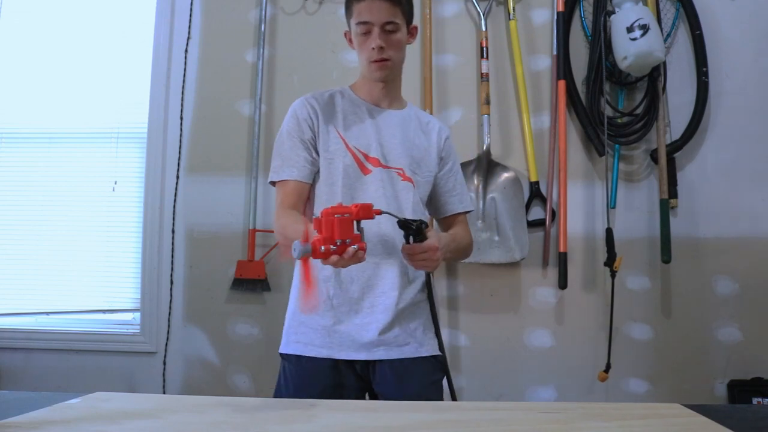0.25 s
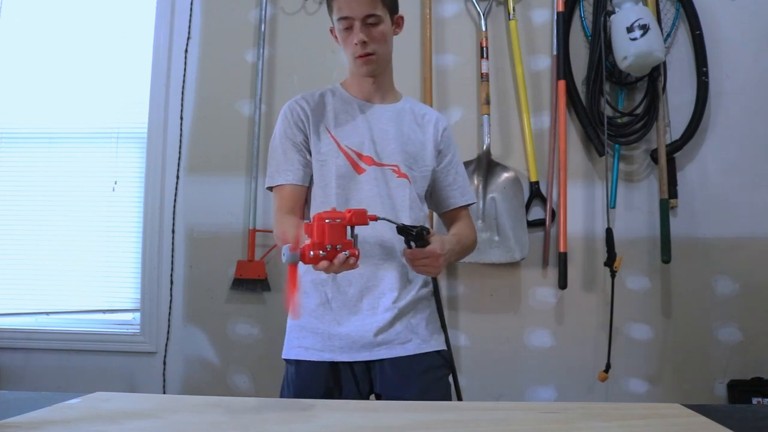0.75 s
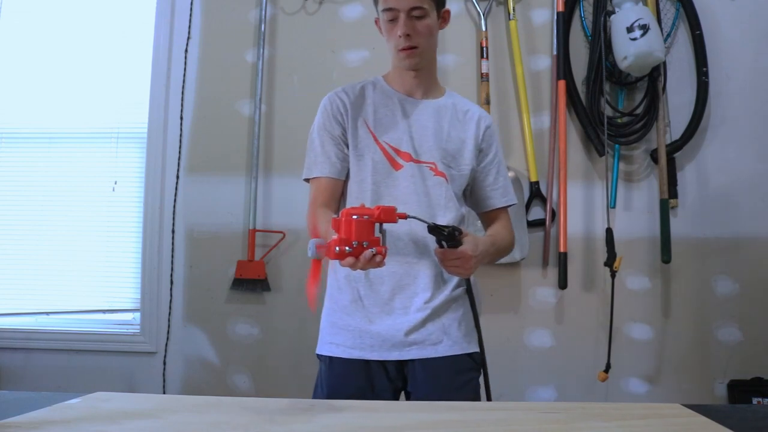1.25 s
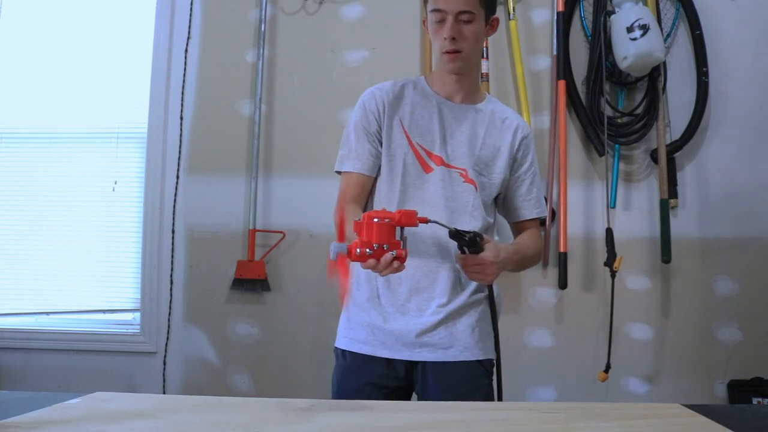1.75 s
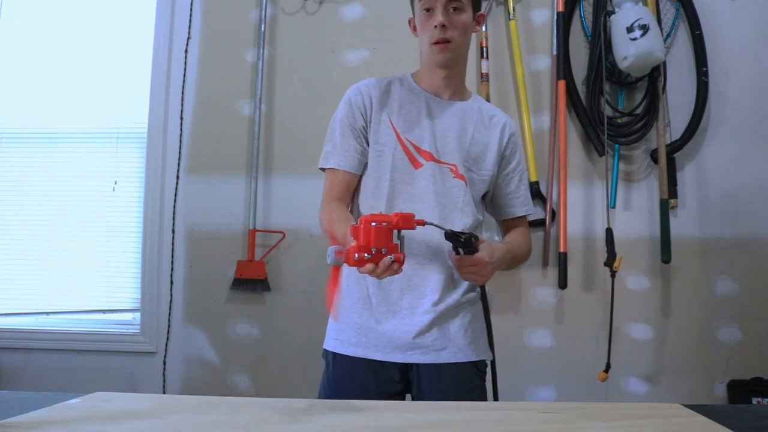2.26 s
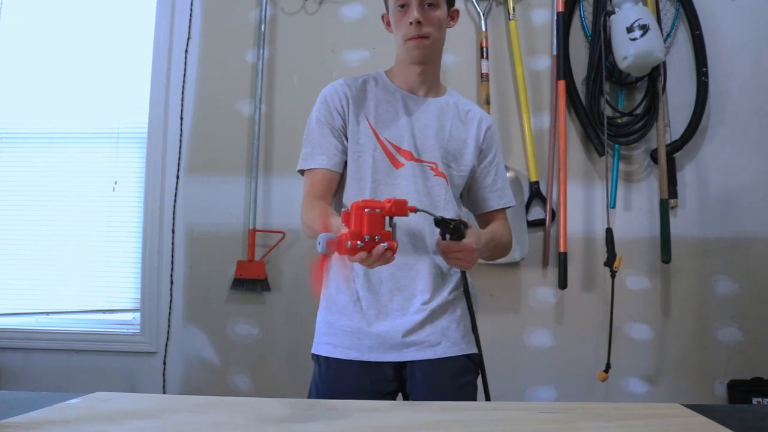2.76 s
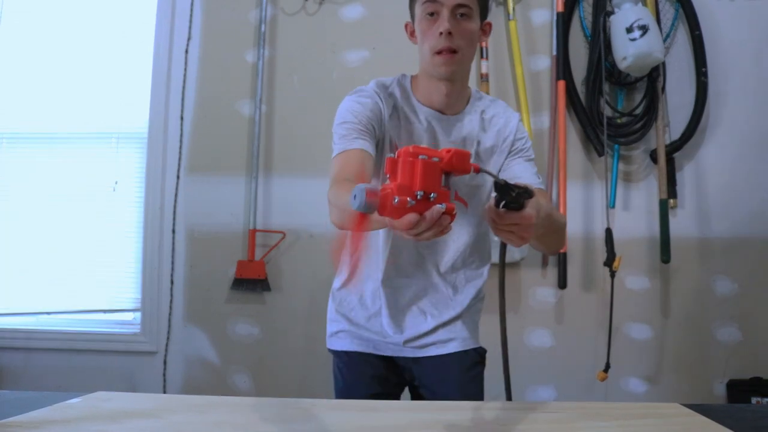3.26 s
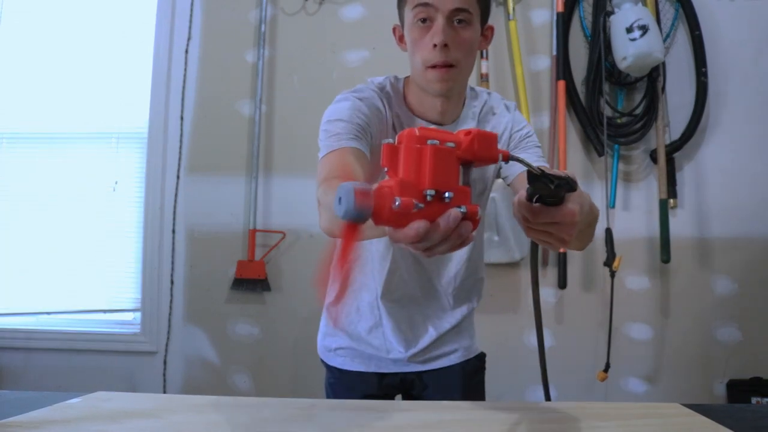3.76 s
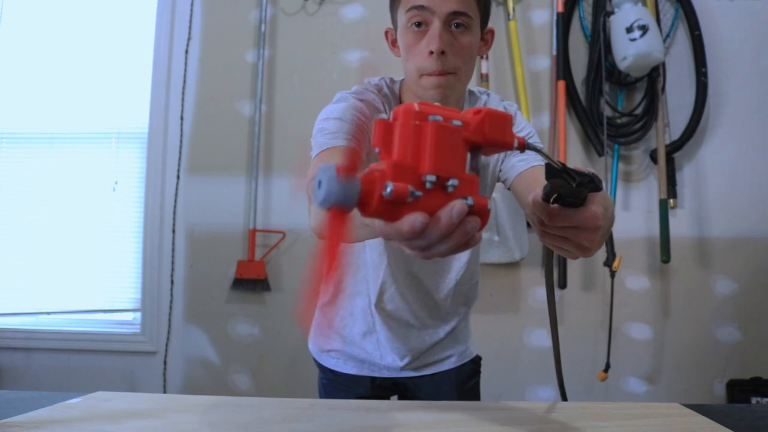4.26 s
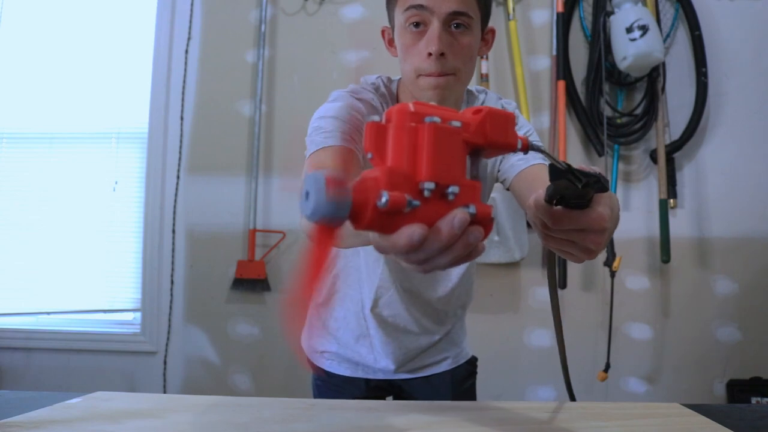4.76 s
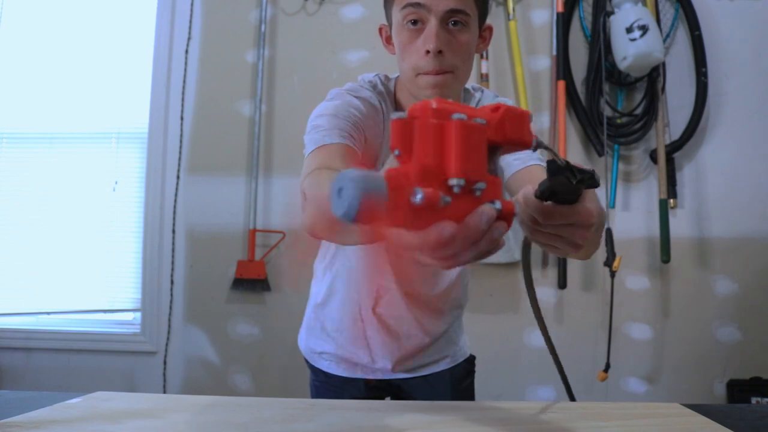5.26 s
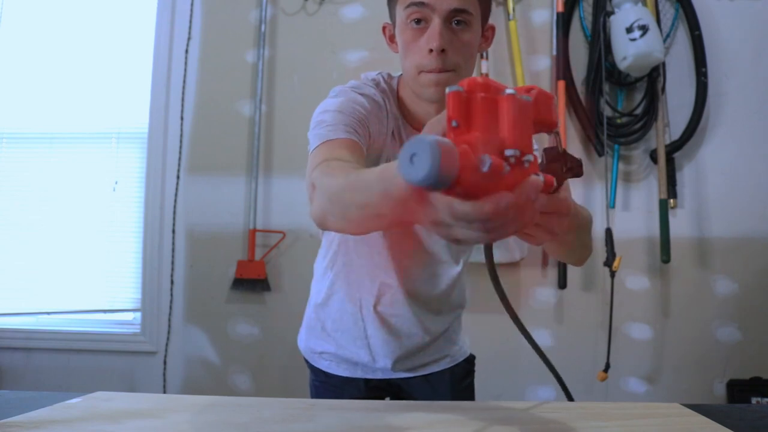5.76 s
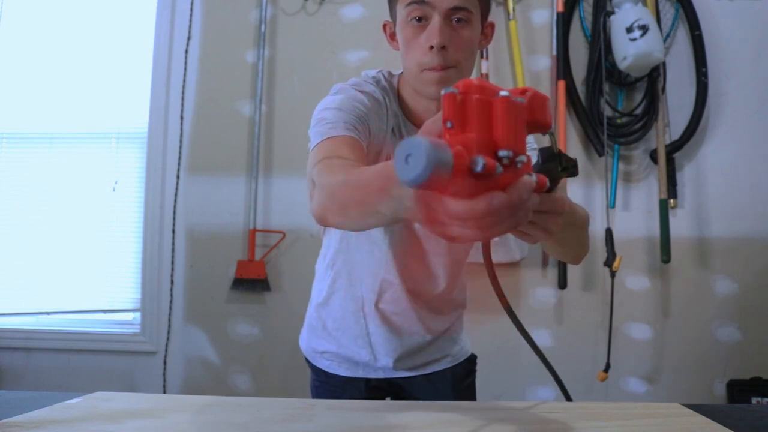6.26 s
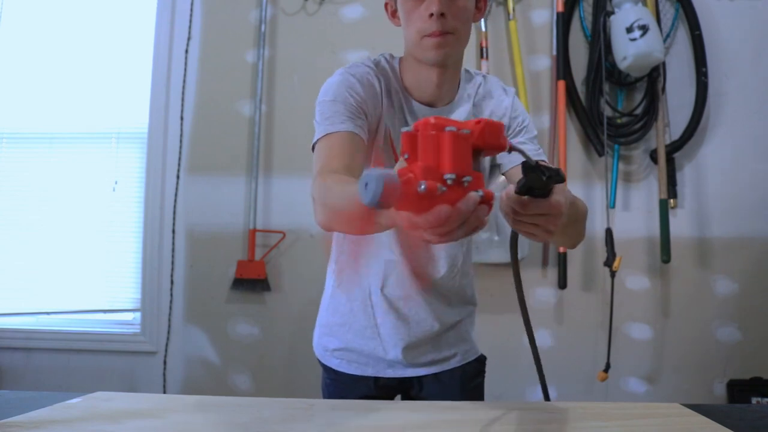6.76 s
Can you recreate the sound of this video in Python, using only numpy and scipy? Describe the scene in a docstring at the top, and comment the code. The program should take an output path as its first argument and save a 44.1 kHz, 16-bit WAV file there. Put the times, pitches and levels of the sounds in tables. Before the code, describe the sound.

Close, dry-edged pneumatic chatter in a bare workshop: rapid pulses of bright air, a continuous nozzle hiss with a thin high whistle, and brittle plastic clicking. The pace rises around three seconds, drops back with loud single knocks near four, then quickens again after five into a denser, blurred flutter as the engine turns toward the microphone. Faint low rumble and wavering hum lie beneath.

```python
"""Compressed-air piston engine

A small plastic engine, held in the hand and turned about, runs on a blow gun in a bare workshop.
The nozzle leak is coloured noise plus an edge whistle. Each turn the exhaust puffs and half a turn later
the inlet gasps: noise gated by the crank. A blade sweeps air; the loose crank rattles and knocks at both
stroke ends, ringing the casing. Sparse echoes, dull bumps, low rumble and wavering hum lie around it.
"""
import sys
import numpy as np
from scipy import signal
from scipy.fft import irfft
from scipy.io import wavfile
from scipy.ndimage import uniform_filter1d

SR = 44100
rng = np.random.default_rng(int(sys.argv[2]) if len(sys.argv) > 2 else 0)


def pcm_store(signal):
    """Save signal as 16-bit PCM."""
    levels = np.round(np.clip(np.atleast_2d(signal), -1, 1) * 32767)
    wavfile.write(sys.argv[1], SR, levels.astype(np.int16).T)


N = 309141
T = np.arange(N) / SR


def gain_of(db):
    """Decibels to amplitude."""
    return 10 ** (np.asarray(db) / 20)


def evened(x):
    """Scaled to rms 1."""
    return x / np.sqrt(np.mean(x ** 2) + 1e-20)


def read(points, hz):
    """Spectrum table interpolated on a log-frequency axis."""
    f, value = np.transpose(points)
    return np.interp(np.log(hz + 1), np.log(f + 1), value)


def curves(table):
    """Every column after the first, interpolated to every sample."""
    s, *columns = np.transpose(table)
    return [np.interp(T, s, c) for c in columns]


def add(mix, s, sound):
    """Mixes a sound in at s seconds."""
    part = mix[round(s * SR):][:len(sound)]
    part += sound[:len(part)]


# building noise, relative density: f/Hz, level/dB per Hz
RUMBLE_SPECTRUM = [(25, -19), (40, -7), (60, -24), (120, -4.5), (250, 1), (450, -52), (900, -44),
                   (2000, -8)]


def rumble():
    """Low noise of the building: random spectrum under a fixed colour."""
    hz = np.fft.rfftfreq(N, 1 / SR)
    re, im = rng.standard_normal((2, len(hz)))
    return evened(irfft((re + 1j * im) * gain_of(read(RUMBLE_SPECTRUM, hz)), N))


# hum tones, relative: f/Hz, rms waver/Hz, level/dB
HUM_TONES = [(54, 1.5, -1.5), (87, 2.5, .5), (207, 3, -3), (1067, 4, 6), (1220, 12, 3)]


def hum():
    """Faint tones whose pitch and strength waver."""
    out = np.zeros(N)
    for hz, waver_hz, db in HUM_TONES:
        drift, swell = (evened(uniform_filter1d(v, size=4000)) for v in rng.standard_normal((2, N)))
        phase = 2 * np.pi * np.cumsum(hz + waver_hz * drift) / SR
        out += gain_of(db + 1.5 * swell) * np.sin(phase)
    return evened(out)


# reverberation: f/Hz, t60/s
ROOM_DECAY = [(200, 0.99), (1000, 0.9), (4000, 0.49), (9000, 0.4), (16000, 0.69)]


def workshop(x):
    """Sparse echoes of random sign, each band dying at its own speed."""
    taps = np.zeros(SR // 2)
    at = np.arange(200, len(taps) - 20, 20)
    taps[at + rng.integers(0, 20, len(at))] = rng.choice([-1., 1.], len(at))
    hz, t, z = signal.stft(taps, SR, nperseg=256)
    decay = gain_of(-60 * t / read(ROOM_DECAY, hz)[:, None])
    tail = signal.istft(z * decay, SR, nperseg=256)[1]
    return signal.fftconvolve(x, tail / np.linalg.norm(tail))[:N]


# dull bumps in the workshop: t/s, level/dB, f/Hz of the knock
BUMP_EVENTS = [(2.054, -31.5, 358), (3.283, -25.5, 609)]


def bumps():
    """A short decaying sine with a longer band-noise thud under it."""
    out, t = np.zeros(N), T[:8000]
    thud_band = signal.butter(2, [220, 500], "band", fs=SR, output="sos")
    for (s, db, hz), grit in zip(BUMP_EVENTS, rng.standard_normal((len(BUMP_EVENTS), 8000))):
        knock = np.sin(2 * np.pi * hz * t) * (1 - np.exp(-t / 0.00074)) * np.exp(-t / 0.0094)
        thud = evened(signal.sosfilt(thud_band, grit)) * (1 - np.exp(-t / .01)) * np.exp(-t / .035)
        add(out, s, gain_of(db) * (knock + .55 * thud))
    return out


def air(colour, patchy_db):
    """Turbulent noise whose colour shifts in small time-frequency patches."""
    frames, hz = N // 128 + 5, np.fft.rfftfreq(512, 1 / SR)
    re, im, patches = rng.standard_normal((frames, 257, 3)).T
    patches = uniform_filter1d(patches, size=8, axis=0)
    patches = evened(uniform_filter1d(patches, size=10, axis=1))
    z = (re + 1j * im) * gain_of(read(colour, hz)[:, None] + patchy_db * patches)
    return evened(signal.istft(z, nperseg=512, noverlap=384)[1][:N])


def valve(turns, at, rise, fall, uneven_db):
    """Flow through a port, widest at angle at; at, rise, fall in turns, no two strokes alike."""
    angle = (turns - at + .5) % 1 - .5
    stroke = np.floor(turns - at + .5).astype(int)
    opening, closing = np.exp(-np.abs(angle / rise) ** 1.5), 1 / (1 + (angle / fall) ** 2)
    shape = np.where(angle < 0, opening, closing)
    shut = 1 - (2 * angle) ** 8  # zero half a turn away
    return shape * shut * gain_of(uneven_db * rng.standard_normal(100)[stroke])


# air swept by the blade on the shaft, relative density: f/Hz, level/dB per Hz
DRAUGHT_SPECTRUM = [(30, -16), (120, 3), (300, -9.5), (700, -3), (2000, -50)]


def draught(turns, exhaust, fast):
    """Low air noise swept by the blade: with each puff, and at speed once more per turn."""
    sweep = 0.52 * exhaust + fast * valve(turns, 0.656, .06, 0.064, uneven_db=2.5)
    return gain_of(-43.5) * sweep * air(DRAUGHT_SPECTRUM, patchy_db=2.0)


def resonate(x, hz, width):
    """Shifts the curve hz down to zero, smooths with two equal poles, shifts back."""
    turn, r = np.exp(2j * np.pi * np.cumsum(hz) / SR), np.exp(-np.pi * width / SR)
    return 2 * (turn * signal.lfilter([(1 - r) ** 2], [1, -2 * r, r ** 2], x / turn)).real


# edge tones: frequency multiple, width/Hz of each pole, level/dB
EDGE_TONES = [(1, 800, 0), (1.16, 700, -3)]


def whistle(hz, second):
    """Air over an edge: a fuzzy, wandering tone, with a weaker one above scaled by second."""
    noise, wander = rng.standard_normal((2, N))
    hz = hz * (1 + .012 * evened(uniform_filter1d(wander, size=2500)))
    (_, width, _), (multiple, upper_width, upper_db) = EDGE_TONES
    upper = resonate(noise, multiple * hz, upper_width)
    return evened(resonate(noise, hz, width) + gain_of(upper_db) * second * upper)


# leak from the side and from the front, relative density: f/Hz, level/dB per Hz
LEAK_SIDE = [(60, -21.5), (250, -23.5), (500, -16), (1200, -12), (2200, -8.5), (3300, -2.5), (4200, -5),
             (5300, -3), (6500, -9), (7600, -9.5), (11000, -9), (13000, -14), (16000, -12)]
LEAK_AHEAD = [(60, -38), (250, -21), (500, -14.5), (1200, -10.5), (2200, -7.5), (3300, -0.5), (4200, -4.5),
              (5300, 1), (6500, -6.5), (8300, -2), (11000, -9.5), (13000, -8), (16000, -12.5)]
WHISTLE_HZ, WHISTLE_FRONT_HZ = 9370, 200  # mean pitch, rise with the nozzle facing


def leak(leak_db, whistle_db, facing, leak_facing, exhaust, inlet):
    """Nozzle hiss, crossfaded side to front, plus a whistle that swells with both port flows."""
    side = np.sqrt(1 - leak_facing) * air(LEAK_SIDE, patchy_db=1)
    front = np.sqrt(leak_facing) * air(LEAK_AHEAD, patchy_db=2)
    tone = whistle(WHISTLE_HZ + WHISTLE_FRONT_HZ * leak_facing, 1 - facing)
    edge = gain_of(whistle_db) * (1 + 2.2 * exhaust + 1.1 * inlet) * tone
    return gain_of(leak_db) * (side + front + edge)


# inlet air, relative density: f/Hz, level/dB per Hz
INLET_SPECTRUM = [(100, -30), (400, -51), (1000, -20.5), (2500, 9), (5500, 7.5), (7200, -7), (9400, 1.5),
                  (11500, 2.5), (16000, 1)]
INLET_DB, INLET_FAST_DB = -20, -2  # level when slow, change when fast


def inlet_gasps(inlet, fast):
    """Bright air noise gated by the inlet flow."""
    return gain_of(INLET_DB + INLET_FAST_DB * fast) * inlet * air(INLET_SPECTRUM, patchy_db=1.5)


# exhaust from the side and from the front, relative density: f/Hz, level/dB per Hz
PUFF_SIDE = [(100, -27), (400, -18), (1000, -11.5), (2000, -0.5), (3500, -2), (5500, 1.5), (7000, -7),
             (8500, -5), (10000, -7), (10900, -3), (12000, -5.5), (16000, -9)]
PUFF_FRONT = [(100, -16.5), (400, -21), (1000, -6), (2000, -9), (3200, 2.5), (4200, 2), (5500, 3.5),
              (7500, -8.5), (9400, -3), (11000, 0.5), (13800, 2), (15200, 0), (16000, -8)]
EXHAUST_DB, EXHAUST_FRONT_DB, EXHAUST_FAST_DB = -18.5, 0.7, -0.1  # level, change when facing, when fast


def exhaust_puffs(exhaust, facing, fast):
    """Jet noise gated by the exhaust flow, crossfaded side to front."""
    side = np.sqrt(1 - facing) * air(PUFF_SIDE, patchy_db=-0.5)
    front = np.sqrt(facing) * air(PUFF_FRONT, patchy_db=0.5)
    db = EXHAUST_DB + EXHAUST_FRONT_DB * facing + EXHAUST_FAST_DB * fast
    return gain_of(db) * exhaust * (side + front)


def small_body(x):
    """A hand-sized plastic casing radiates no bass and little high treble."""
    return signal.sosfilt(signal.butter(3, [1000, 8500], "band", fs=SR, output="sos"), x)


# plastic casing modes before detuning, damping and body filter: f/Hz, level/dB, t60/s
CASING_MODES = [(1235, -17, 0.24), (1972, -24, 0.27), (2954, 1.5, 0.033), (3540, 11.5, 0.0093),
                (4460, 5.5, 0.011), (4980, 8, 0.02), (5250, 11.5, 0.0051), (7900, -20, .012),
                (9400, -40, .012)]


def ring(detune, low_db):
    """Casing after one click, its modes slightly detuned afresh for each blow; low_db lifts those under 4 kHz."""
    t, out = T[:2000], 0
    for (hz, db, t60), d in zip(CASING_MODES, detune):
        decay = gain_of(db + low_db * (hz < 4000) - 60 * t / t60)
        out = out + decay * np.sin(2 * np.pi * hz * d * t)
    return out


def rattle(slack, per_s, spread_db, damping):
    """Random clicks, per_s * slack a second, each in one of nine detuned, damped versions of the modes."""
    size = gain_of(spread_db * np.minimum(rng.exponential(1, N), 3))
    size = size * (rng.random(N) < per_s * slack / SR)
    version, t, out = rng.integers(0, 9, N), T[:1000], np.zeros(N)
    for k, lift_db in enumerate(rng.normal(0, 3, (9, len(CASING_MODES)))):
        detune, tick = 1 + (k - 4) / 80, 0
        for (hz, db, t60), lift in zip(CASING_MODES, lift_db):
            decay = gain_of(db + lift - 60 * damping * t / t60)
            tick = tick + decay * np.sin(2 * np.pi * hz * detune * t)
        out += signal.oaconvolve(size * (version == k), tick)[:N]
    return evened(small_body(out))


# slack crank knocks each turn: angle/turns, mean peak level/dB, mean low-ring lift/dB
STROKE_END_KNOCKS = [(.425, -14, -7), (.92, -16.5, 1)]
KNOCK_SPREAD_DB, LOW_SPREAD_DB, KNOCK_SCATTER_TURNS = 2.5, 5, .015


def ordinary_knocks(turns):
    """Knocks of chance strength at every stroke end that has no loud knock."""
    rows, loud_s = [], np.transpose(LOUD_KNOCKS)[0]
    for angle, db, low_db in STROKE_END_KNOCKS:
        for k, (a, b, c) in zip(range(0, int(turns[-1])), rng.standard_normal((100, 3))):
            s = np.interp(k + angle + KNOCK_SCATTER_TURNS * a, turns, T)
            if np.abs(loud_s - s).min() > .015:
                rows.append((s, db + KNOCK_SPREAD_DB * b, low_db + LOW_SPREAD_DB * c))
    return rows


# loudest crank knocks: t/s, peak level/dB, low-ring lift/dB
LOUD_KNOCKS = [(0.064, -4, 0), (0.3036, -2.5, -11), (0.6479, -8, -2), (0.9885, -9, -7), (2.3331, -7, 7),
               (3.1652, -9.5, -10), (3.2915, -9.5, -14), (3.334, -10, -12), (3.6037, -7.5, -10),
               (3.6576, -7, -15), (3.7983, -8, 3), (3.894, -2.5, -16), (4.115, -1, -3), (4.2262, -5.5, -28),
               (4.3362, -4.5, -6), (4.4487, -3, -10), (4.5573, -2.5, -21), (4.664, -11, -11),
               (4.91, -8, -6), (4.9607, -7, -2), (5.3194, -8, -14), (5.6428, -7.5, 7), (5.8055, -7.5, -20),
               (5.9667, -7, -5), (6.2106, -5.5, -1), (6.4543, -7.5, -12), (6.696, -9, -18),
               (6.8588, -7.5, -23), (6.906, -9, -7)]
# at speed the blow smears and the hard contact weakens
SCATTER_S, SCATTER_FAST_S, CONTACT_FAST_DB = .0018, .0045, -14


def knocks(turns, fast):
    """One hard contact and a scatter of small ones set the casing ringing."""
    out, t = np.zeros(N), T[:700]
    rows = LOUD_KNOCKS + ordinary_knocks(turns)
    for (s, db, low_db), grit in zip(rows, rng.standard_normal((200, 700))):
        pace = np.interp(s, T, fast)
        length_s = SCATTER_S + (SCATTER_FAST_S - SCATTER_S) * pace
        contact = gain_of(CONTACT_FAST_DB * pace) * (np.arange(700) == 40)
        scatter = .22 * grit * (1 - np.exp(-3 * t / length_s)) * np.exp(-t / length_s)
        detune = 1 + .02 * grit[:len(CASING_MODES)]
        sound = small_body(signal.fftconvolve(scatter + contact, ring(detune, low_db)))
        add(out, s, gain_of(db) * sound / np.abs(sound).max())
    return out


# crank speed: t/s, speed/turns per s
CRANK_SPEED = [(0, 8.538), (.74, 8.763), (2.42, 9.067), (2.98, 12.29), (3.06, 11.964), (3.14, 12.151),
               (4.13, 8.95), (4.56, 9.103), (5.48, 12.508), (6.25, 12.275), (7.01, 12.429)]
# how it is held: t/s, leak level/dB, port facing microphone/0-1, nozzle facing microphone/0-1,
# whistle level re leak/dB before the port flows swell it
HOLD = [(0, -24.5, 0.13, 0.03, -21), (.5, -23, 0.16, 0.13, -14), (2.3, -23, 0.01, 0.05, -13),
        (2.9, -21, 0.67, .15, -15), (3.2, -22, 0.36, .1, -15.5), (3.6, -23.5, 0.5, 0.04, -15),
        (4.2, -26, 0.54, 0.2, -12), (4.7, -26.5, 0.56, 0.37, -10.5), (5.3, -24, 1, 0.67, -11.5),
        (5.9, -23.5, 0.94, 0.78, -33), (6.5, -24, .9, 0.97, -26), (7.01, -24.5, 1, 0.9, -16)]
START_TURN, SLOW_TURNS_PER_S, FAST_TURNS_PER_S = .837, 9, 12.4  # whole turns near the exhaust
EXHAUST_WIDER_FAST = 0.33  # at speed the puff covers more of the turn
RATTLE_DB, RATTLE_FRONT_DB = -28, -5.5  # level, change with the port facing


def engine():
    """Ports, loose crank and blade timed by the crank angle, over the leak."""
    speed, = curves(CRANK_SPEED)
    leak_db, facing, leak_facing, whistle_db = curves(HOLD)
    facing, leak_facing = np.clip(facing, 0, 1), np.clip(leak_facing, 0, 1)
    turns = START_TURN + np.cumsum(speed) / SR
    fast = np.clip((speed - SLOW_TURNS_PER_S) / (FAST_TURNS_PER_S - SLOW_TURNS_PER_S), 0, 1)
    wider = 1 + EXHAUST_WIDER_FAST * fast
    exhaust = valve(turns, -0.024, 0.1 * wider, 0.095 * wider, uneven_db=0.7)
    inlet = valve(turns, 0.46, 0.05, 0.095, uneven_db=1.5)
    # clicks crowd where the piston reverses
    slack = 0.092 + valve(turns, -0.04, 0.045, .06, uneven_db=3.5)
    slack = slack + valve(turns, .44, 0.036, .07, uneven_db=4)
    clicks = rattle(slack, per_s=1200, spread_db=4.0, damping=3.6)
    return (draught(turns, exhaust, fast)
            + leak(leak_db, whistle_db, facing, leak_facing, exhaust, inlet)
            + inlet_gasps(inlet, fast) + exhaust_puffs(exhaust, facing, fast)
            + gain_of(RATTLE_DB + RATTLE_FRONT_DB * facing) * clicks + knocks(turns, fast))


# workshop background: t/s, rumble level/dB, hum level/dB
BACKGROUND_LEVELS = [(0, -37.5, -51), (.6, -39, -45), (1.7, -36.5, -48.5), (2.35, -39.5, -56),
                     (2.65, -44, -44), (3.1, -43, -44.5), (3.6, -48, -49), (3.95, -43, -56),
                     (4.7, -46, -54), (5.4, -46, -53), (6.2, -44, -49), (7.01, -47, -61)]


def scene():
    """Engine and bumps, direct and echoed, over rumble and hum."""
    rumble_db, hum_db = curves(BACKGROUND_LEVELS)
    background = gain_of(rumble_db) * rumble() + gain_of(hum_db) * hum()
    machine, bump = engine(), bumps()
    echoed = workshop(gain_of(-9.5) * machine + gain_of(-9) * bump)
    return (machine + bump + echoed + background)[None]


EDGE_HZ = 15790  # upper band limit


def record(dry):
    """The microphone drops the deepest bass; a steep low-pass then limits the band."""
    thin = signal.sosfilt(signal.butter(2, 46, "high", fs=SR, output="sos"), dry)
    low_pass = signal.firwin(511, EDGE_HZ, window=("kaiser", 9), fs=SR)
    return signal.oaconvolve(thin, low_pass[None], "same")


dry = scene()
out = record(dry)
pcm_store(out)
```